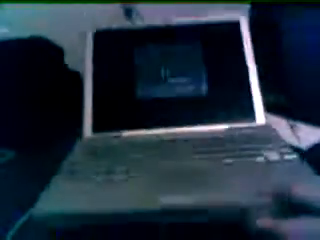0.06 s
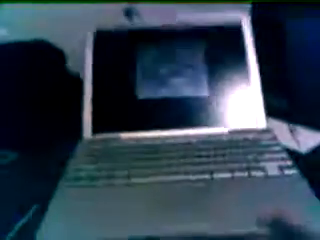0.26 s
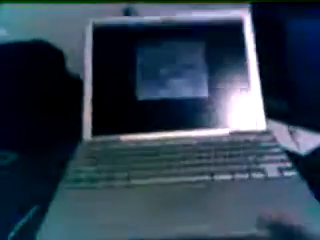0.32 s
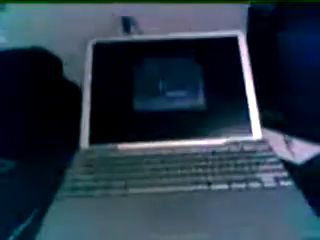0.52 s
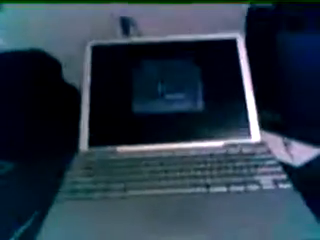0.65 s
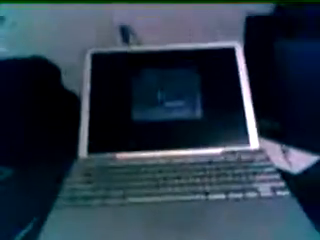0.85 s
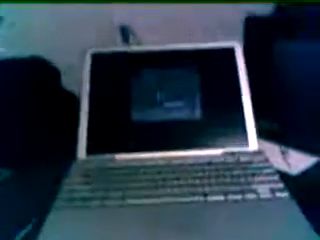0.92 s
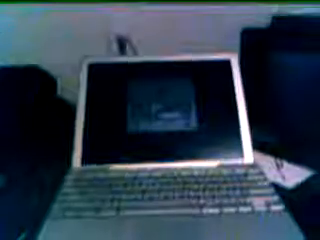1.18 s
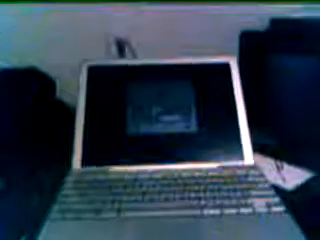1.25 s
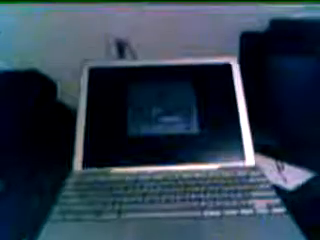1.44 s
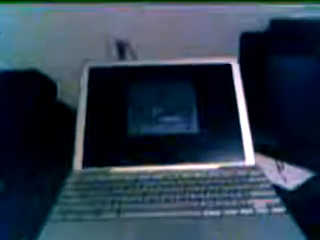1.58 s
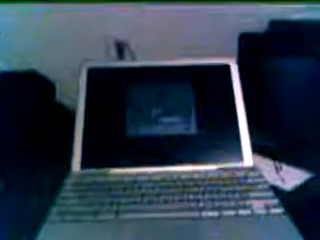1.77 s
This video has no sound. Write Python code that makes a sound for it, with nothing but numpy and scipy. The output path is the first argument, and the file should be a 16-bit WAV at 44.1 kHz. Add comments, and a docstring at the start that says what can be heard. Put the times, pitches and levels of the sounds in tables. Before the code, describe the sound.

A laptop lands on a desk with one loud, rattling knock and a low boom, briefly overloading the close microphone. A soft hollow bump and plastic ticks follow, then a lighter clatter, over hum and hiss in a small room.

```python
"""Faint taps and a tick sound over hum and hiss, then a laptop is set down hard on a desk.
Each impact excites the modes of its case and of the desk top, which booms and sways; a small room
reverberates. A soft, hollow bump and light plastic ticks follow, then a second, lighter clatter.
The close, narrow-band microphone overloads on the first hard knock."""
import sys
import numpy as np
from scipy import signal
from scipy.fft import rfft, irfft, next_fast_len
from scipy.io import wavfile
from scipy.ndimage import map_coordinates

SR = 44100
rng = np.random.default_rng(int(sys.argv[2]) if len(sys.argv) > 2 else 0)


def put_to_file(sound):
    """Save the sound as 16-bit audio at rate SR, in the file named by the first command-line argument."""
    columns = np.atleast_2d(sound).T  # one column per channel
    safe = np.clip(columns, -1, 1)
    whole_steps = np.round(safe * 32767)
    wavfile.write(sys.argv[1], SR, whole_steps.astype(np.int16))


N = 79380

# Spectrum of the laptop's rattling parts. Each row: frequency in Hz, relative level in dB.
RATTLE_SPECTRUM = [(100, -26), (300, -2.5), (1100, -4), (1800, -8), (2800, -11.5), (4000, -18)]


def amp(db):
    """Amplitude ratio: tenfold for every 20 dB."""
    return 10 ** (np.asarray(db) / 20)


def unit(x):
    """Normalisation to an rms of 1."""
    return x / np.sqrt(np.mean(x ** 2) + 1e-20)


def along(points, hz):
    """Interpolation of (Hz, value) points on a logarithmic frequency axis."""
    freqs, values = np.transpose(points)
    return np.interp(np.log(hz + 1), np.log(freqs + 1), values)


def filtered(x, response):
    """Linear filtering: the spectrum is multiplied by a frequency response."""
    size = next_fast_len(N + SR // 2)
    hz = np.fft.rfftfreq(size, 1 / SR)
    return irfft(rfft(x, size) * response(hz), size)[:N]


def noise(spectrum):
    """Spectral shaping turns white noise into coloured noise of rms 1."""
    return unit(filtered(rng.standard_normal(N), lambda hz: amp(along(spectrum, hz))))


def wobble(knots_per_s):
    """Spline interpolation of random knots gives a smooth fluctuation."""
    return map_coordinates(rng.standard_normal(256), [np.arange(N) * knots_per_s / SR], mode="mirror")


def fade(t, t60):
    """Exponential damping: 60 dB of decay in t60 seconds."""
    return np.exp(-np.log(1000) * t / t60)


def add(track, start_s, sound):
    """Superposition of a sound on the track."""
    i = max(0, round(start_s * SR))
    track[i:i + len(sound)] += sound[:N - i]


def ring(modes, attack_s):
    """Free vibration: damped modes of alternating sign, their strengths varying from blow to blow."""
    t = np.arange(SR // 2) / SR
    tones = np.zeros(len(t))
    for k, (hz, db, t60) in enumerate(modes):
        strength = amp(db + 1.5 * rng.standard_normal())
        tones += (-1) ** k * strength * fade(t, t60) * np.sin(2 * np.pi * hz * t)
    return tones * (1 - np.exp(-t / attack_s))


def burst(spectrum, t60, attack_s):
    """Modal overlap: the dense resonances of many small parts merge into decaying noise."""
    t = np.arange(SR // 2) / SR
    return noise(spectrum)[:len(t)] * fade(t, t60) * (1 - np.exp(-t / attack_s))


def hum_and_hiss():
    """Stationary background: a pure tone of mains hum in fan-like broadband noise."""
    # Spectrum of the hiss. Each row: frequency in Hz, relative spectral density in dB.
    hiss_spectrum = [(20, 20.5), (45, -2.5), (90, -2), (220, 2), (400, -7), (630, -2), (760, -6), (920, -2),
                     (1250, -11.5), (1750, -7.5), (2100, -10.5), (2470, -3.5), (2700, -6.5), (3100, -8),
                     (4000, -15)]
    hum = unit(np.sin(2 * np.pi * 121.4 * np.arange(N) / SR))
    return amp(-42.5) * hum + amp(-36) * noise(hiss_spectrum)


def room(x):
    """Reverberation: convolution with the early reflections and diffuse tail of a small room."""
    # Decay of the room. Each row: frequency in Hz, reverberation time in seconds.
    reverb_times = [(100, 0.49), (500, 0.34), (1500, 0.37), (4000, 0.43)]
    hz, t, bands = signal.stft(rng.standard_normal(SR // 2), SR, nperseg=256)
    tail = signal.istft(bands * fade(t, along(reverb_times, hz)[:, None]), SR, nperseg=256)[1]
    early = rng.standard_normal(len(tail)) * fade(np.arange(len(tail)) / SR, t60=0.11)
    response = amp(-7.5) * tail / np.linalg.norm(tail) + amp(-10) * early / np.linalg.norm(early)
    delayed = np.pad(x, (round(0.008 * SR), 0))
    return signal.fftconvolve(delayed, response)[:N]


def desk_sway():
    """The desk shakes in a low oscillation, modulated in amplitude and frequency."""
    # Envelope of the sway. Each row: time in seconds, level in dB.
    envelope = [(0, -22.5), (.12, -30), (.18, -36), (0.251, -20.5), (.32, -27), (0.391, -22.5), (.5, -34),
                (0.591, -52.5), (0.732, -29.5), (.772, -42.5), (0.815, -25.5), (.88, -45.5), (1.38, -41.5),
                (1.491, -22), (1.591, -30.5), (1.68, -39.5), (1.8, -34)]
    level_db = np.interp(np.arange(N) / SR, *np.transpose(envelope))
    hz = 39.67 + 4 * wobble(knots_per_s=24.42)
    return amp(level_db) * unit(np.sin(2 * np.pi * np.cumsum(hz) / SR))


def ticks_and_bumps():
    """Impulse excitation: light contacts make plastic tick, soft ones make a hollow part resonate."""
    # Plastic ticks and soft bumps. Each row: start in seconds, level in dB.
    ticks = [(0.0837, -25.5), (0.691, -38), (0.7839, -19.5), (0.7895, -28)]
    bumps = [(0.682, -27.5), (0.6904, -21), (0.785, -34.5), (1.047, -46.5)]
    # Spectrum of a tick. Each row: frequency in Hz, relative level in dB.
    tick_spectrum = [(200, -8), (620, -8), (1200, -17), (1800, -5.5), (2400, -5.5), (2950, -1.5),
                     (4000, -15.5)]
    # Modes of the hollow part. Each row: frequency in Hz, level in dB, 60 dB decay time in seconds.
    hollow_modes = [(110.2, -10.5, 0.28), (220.5, -5.5, 0.25), (254, -6, 0.076), (246.6, -2, .16),
                    (411.8, -14.5, 0.45), (510, -4, 0.025), (625, -4, 0.22), (910, -10.5, 0.098),
                    (1155, -17, 0.038), (1530, -18.5, .07)]
    out = np.zeros(N)
    for start, db in ticks:
        add(out, start, amp(db) * burst(tick_spectrum, t60=0.042, attack_s=0.00041))
    for start, db in bumps:
        add(out, start, amp(db) * ring(hollow_modes, attack_s=0.0026))
    return out


def panel_taps():
    """Heavy damping makes a tapped panel clack dryly, with a small rattle and a dull thump."""
    # Taps as the laptop is handled. Each row: start in seconds, clack, rattle and thump levels in dB.
    taps = [(0.0005, -23.5, -25, -24.5), (0.015, -26.5, -32.5, -30), (1.4, -5, -18, -33),
            (1.410, -26.5, -31, -21), (1.441, -20, -21.5, -16), (1.4640, -3, -18, -24),
            (1.4690, -10.5, -17, -16.5), (1.484, -26, -24, -9), (1.503, -23.5, -24.5, -16),
            (1.517, -26.5, -29, -26), (1.5816, -35, -51, -28.5), (1.729, -21, -38, -26)]
    # Modes of the panel. Each row: frequency in Hz, level in dB, 60 dB decay time in seconds.
    panel_modes = [(557, -2, 0.016), (720, -7, 0.024), (899, -3, 0.026), (1143, -3, 0.017)]
    # Spectrum of a thump. Each row: frequency in Hz, relative level in dB.
    thump_spectrum = [(25, -6), (70, -2.5), (140, 1), (220, -6.5), (400, -14), (900, -22.5), (2000, -66.5)]
    out = np.zeros(N)
    for start, clack_db, rattle_db, thump_db in taps:
        add(out, start, amp(clack_db) * ring(panel_modes, attack_s=0.00064))
        add(out, start, amp(rattle_db) * burst(RATTLE_SPECTRUM, t60=0.064, attack_s=0.00054))
        add(out, start, amp(thump_db) * burst(thump_spectrum, t60=0.11, attack_s=0.0027))
    return out


def laptop_landing():
    """An impact excites the modes of both bodies: the case rings and rattles, the desk thuds."""
    # The landing and its bounces. Each row: start in seconds, ring, rattle and thud levels in dB.
    impacts = [(0.206, 0.5, -4.5, 3.5), (0.2113, 2, 0.5, 2.5), (0.2235, -7.5, -2, -0.5),
               (0.2377, -8.5, -4.5, 2.5), (0.2543, -18.5, -8.5, -3), (0.276, -26, -13.5, -25.5),
               (0.296, -18.5, -18.5, -19), (0.377, -42, -31, -25)]
    # Modes of case and desk top. Each row: frequency in Hz, level in dB, 60 dB decay time in seconds.
    case_modes = [(282.3, -20, 0.24), (380, -16.5, 0.061), (463.8, -10, 0.18), (537.4, -13, 0.1),
                  (675.7, -9.5, 0.12), (846, -8.5, 0.084), (911.4, -6.5, 0.058), (1032, -4.5, 0.029),
                  (1160, -3.5, 0.026), (1417, -8, 0.044), (1605, -9.5, 0.078), (2030, -17.5, 0.033)]
    desk_modes = [(38.3, -11.5, 0.38), (70.7, -7.5, 0.12), (102.5, -1.5, .14), (131.6, -0.5, 0.13),
                  (173.6, -14, .08), (265.8, -13, 0.16)]
    case, desk = np.zeros(N), np.zeros(N)
    for start, ring_db, rattle_db, thud_db in impacts:
        add(case, start, amp(ring_db) * ring(case_modes, attack_s=0.00033))
        add(case, start, amp(rattle_db) * burst(RATTLE_SPECTRUM, t60=0.06, attack_s=0.00037))
        add(desk, start, amp(thud_db) * ring(desk_modes, attack_s=0.0027))
    return case, desk


def scene():
    """Direct and reverberant sound add; the desk's thud and the close taps arrive mostly direct."""
    case, desk = laptop_landing()
    airborne = case + ticks_and_bumps()
    taps = panel_taps()
    reverberation = room(airborne + amp(-7.5) * desk + amp(-4.5) * taps)
    return (airborne + desk + taps + reverberation + desk_sway() + hum_and_hiss())[None]


def record(dry):
    """Saturation: a narrow-band microphone clips on loud peaks, and the resulting treble is dulled."""
    # Responses of the microphone and of its overload's crackle. Each row: frequency in Hz, gain in dB.
    mic_response = [(20, 3), (3000, -1), (3500, 0.5), (3900, -6.5), (4250, -11), (4600, -36), (5000, -100)]
    crackle_response = [(4800, -13.5), (7500, -5), (11000, -5.5), (16000, -13)]
    clip_level, hardness = 0.71, 24
    band_edge_hz, cutoff_hz = 3900, 16500
    narrow = filtered(dry[0], lambda hz: amp(along(mic_response, hz)))
    clipped = narrow / (1 + np.abs(narrow / clip_level) ** hardness) ** (1 / hardness)
    dulling = [(band_edge_hz, 0)] + crackle_response
    return filtered(clipped, lambda hz: (hz < cutoff_hz) * amp(along(dulling, hz)))[None]


dry = scene()
out = record(dry)
put_to_file(out)
```